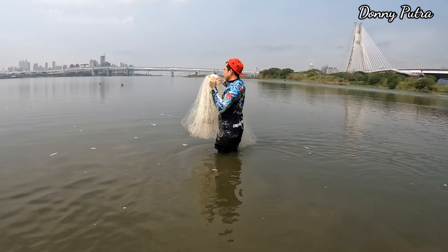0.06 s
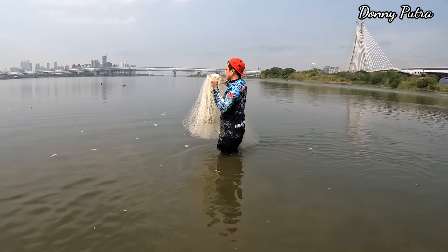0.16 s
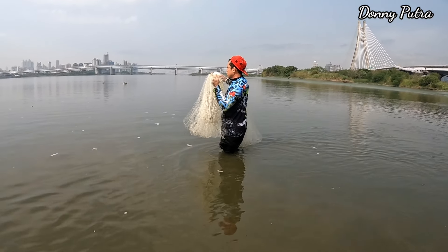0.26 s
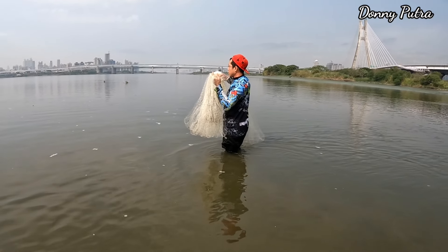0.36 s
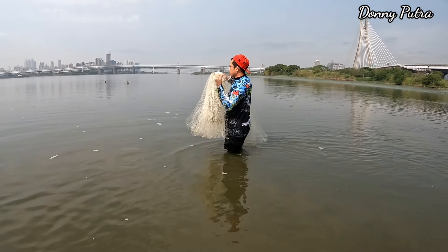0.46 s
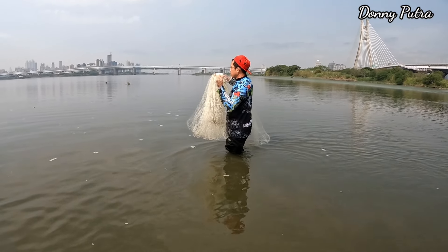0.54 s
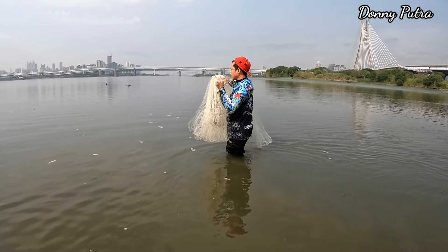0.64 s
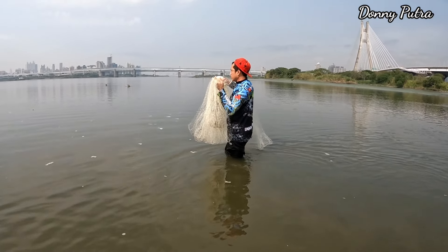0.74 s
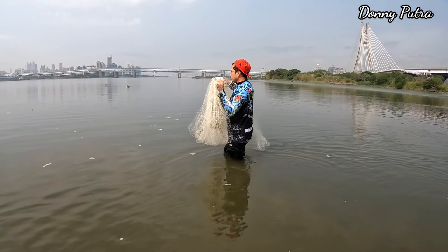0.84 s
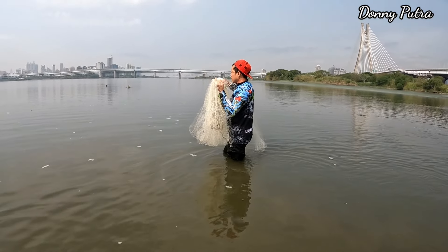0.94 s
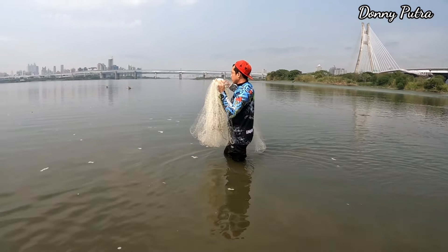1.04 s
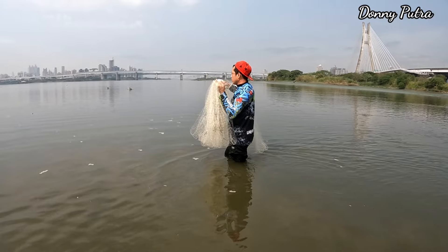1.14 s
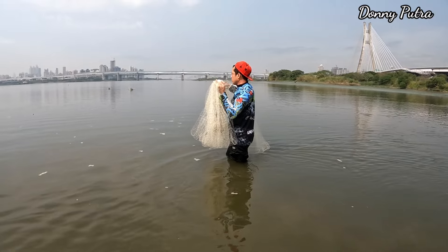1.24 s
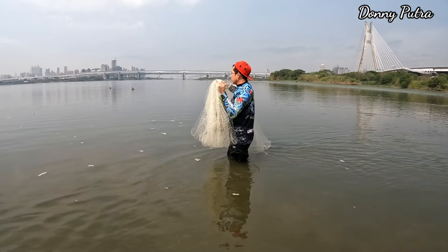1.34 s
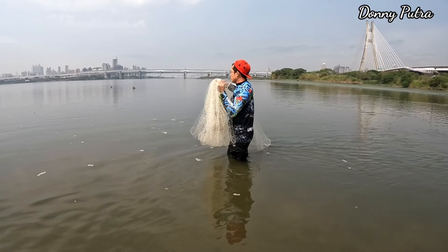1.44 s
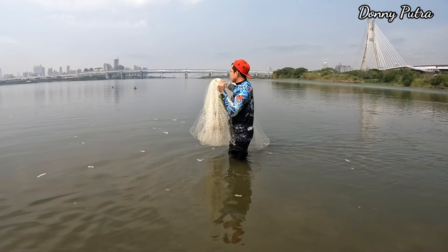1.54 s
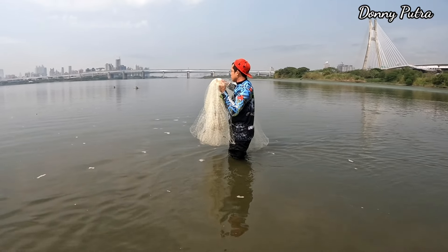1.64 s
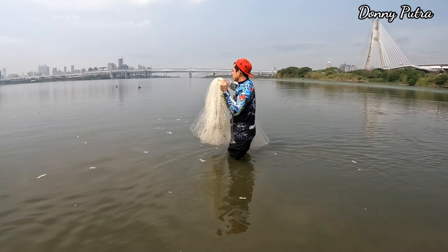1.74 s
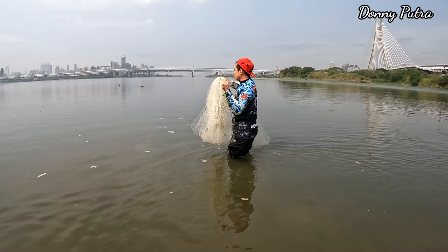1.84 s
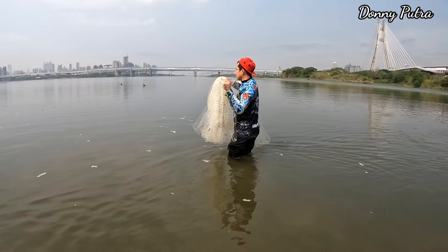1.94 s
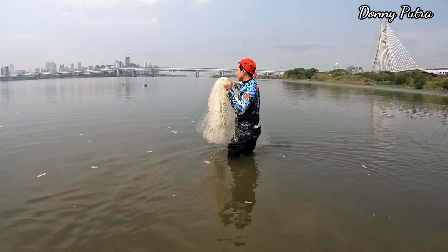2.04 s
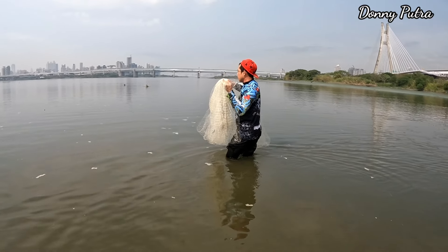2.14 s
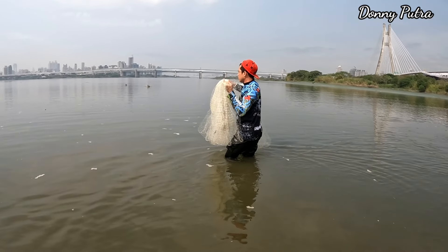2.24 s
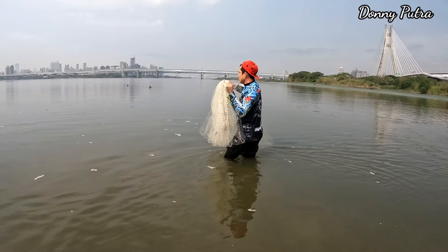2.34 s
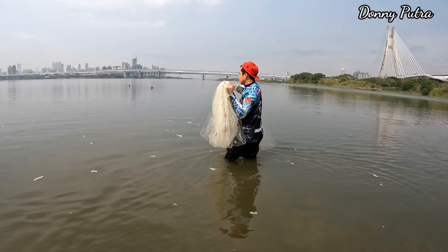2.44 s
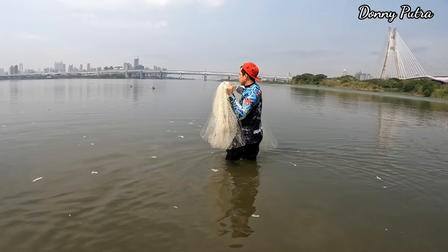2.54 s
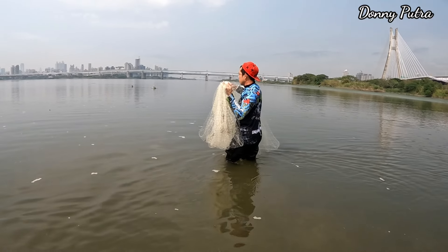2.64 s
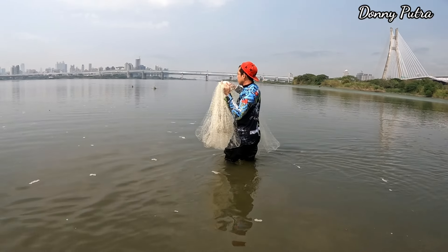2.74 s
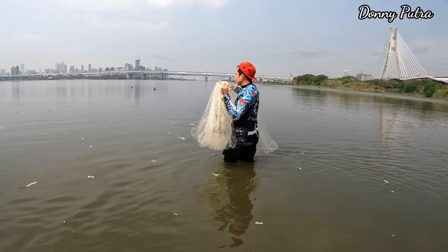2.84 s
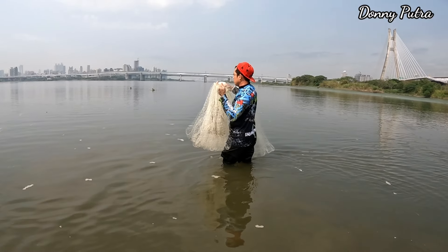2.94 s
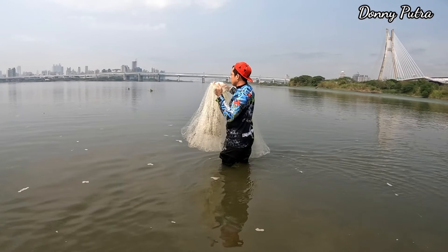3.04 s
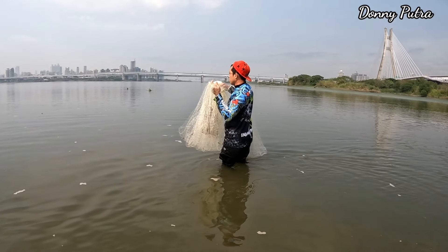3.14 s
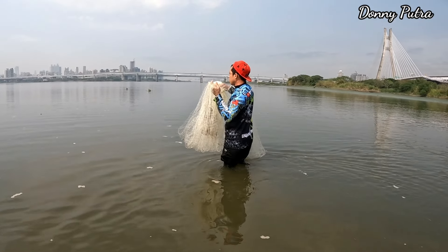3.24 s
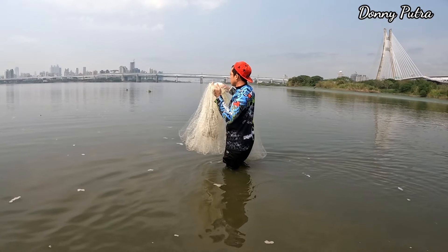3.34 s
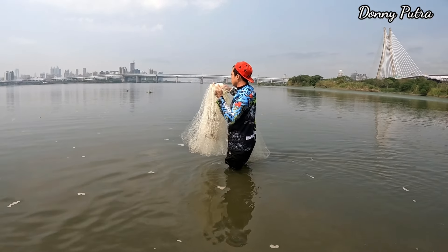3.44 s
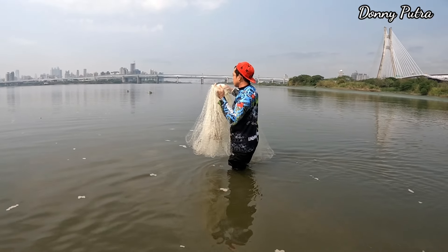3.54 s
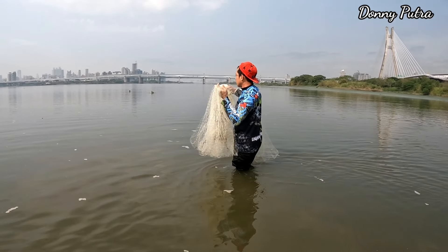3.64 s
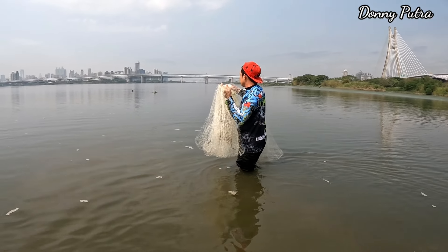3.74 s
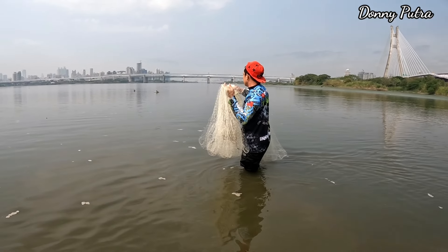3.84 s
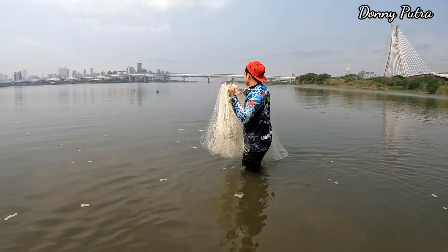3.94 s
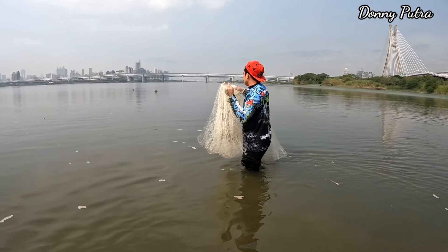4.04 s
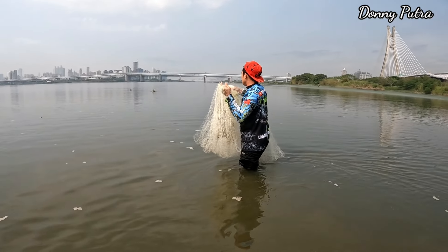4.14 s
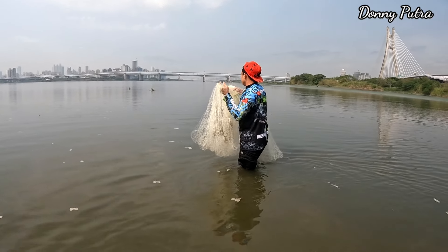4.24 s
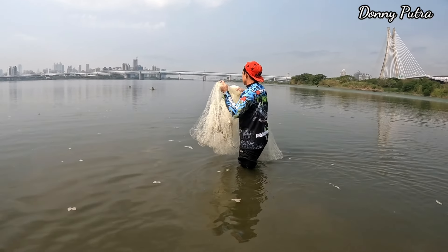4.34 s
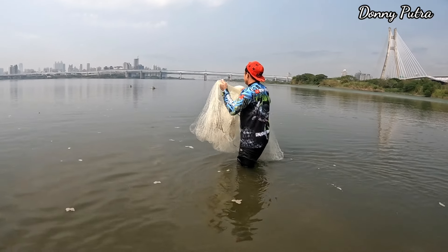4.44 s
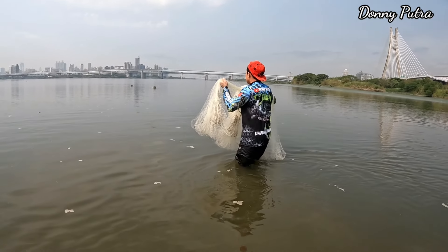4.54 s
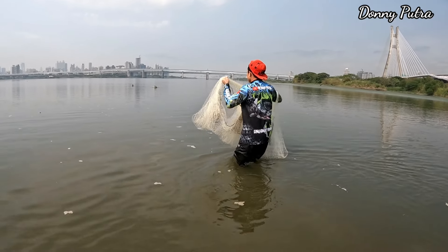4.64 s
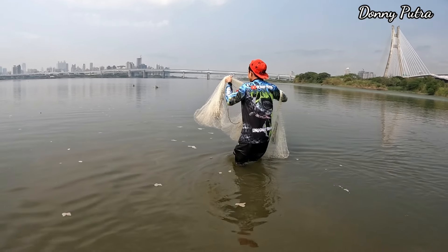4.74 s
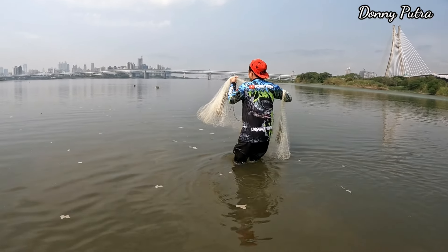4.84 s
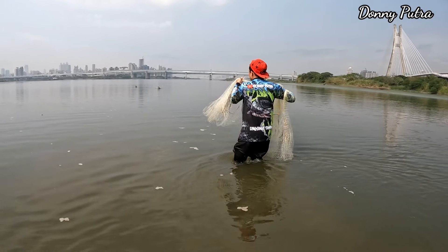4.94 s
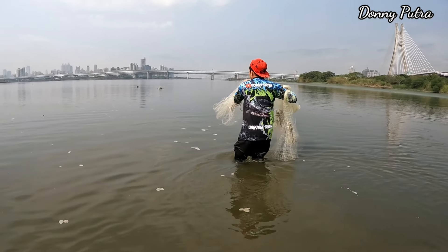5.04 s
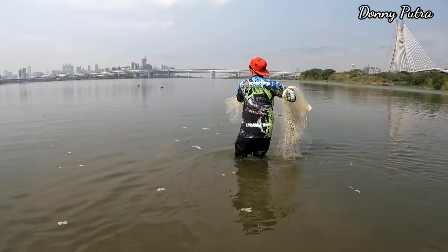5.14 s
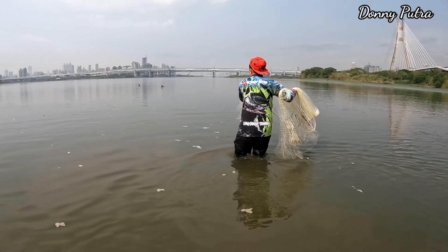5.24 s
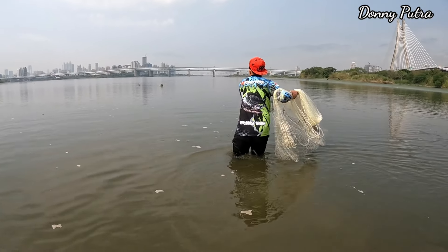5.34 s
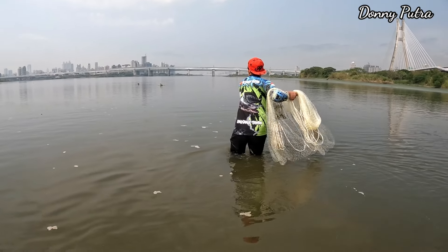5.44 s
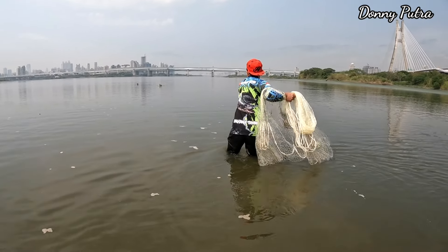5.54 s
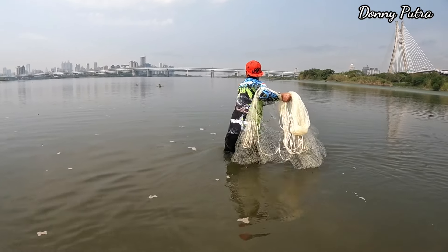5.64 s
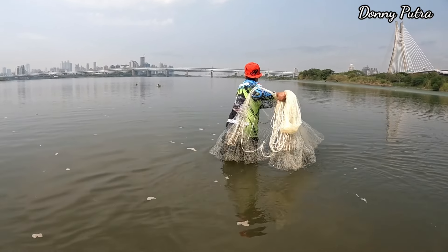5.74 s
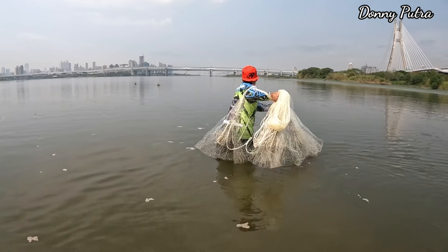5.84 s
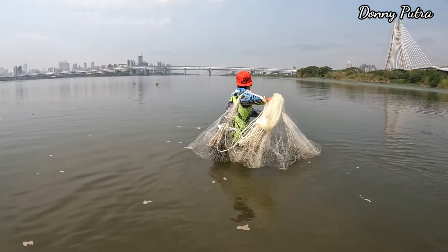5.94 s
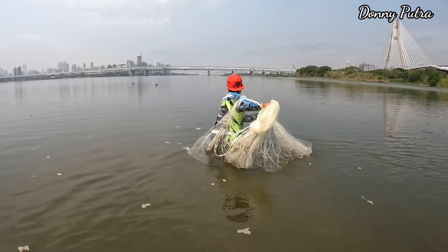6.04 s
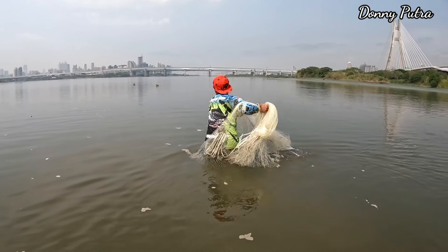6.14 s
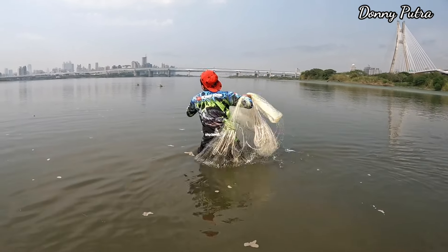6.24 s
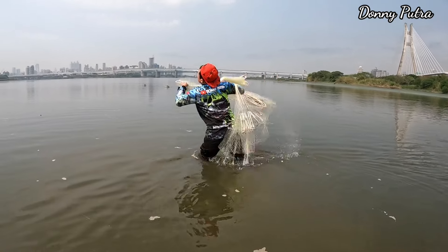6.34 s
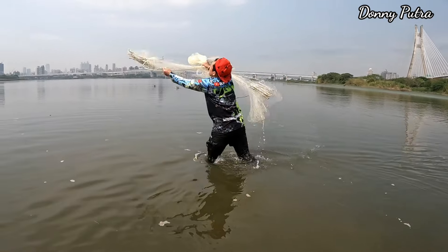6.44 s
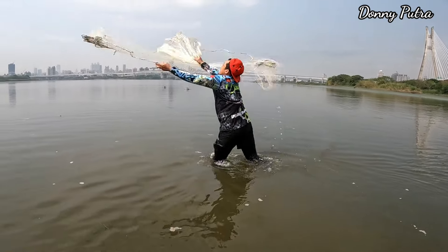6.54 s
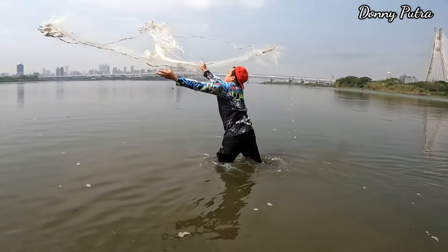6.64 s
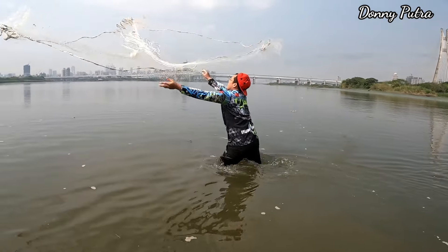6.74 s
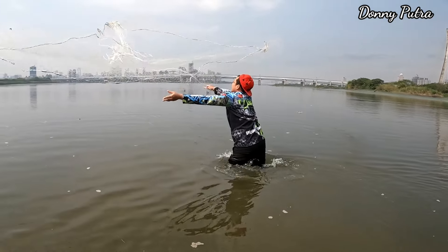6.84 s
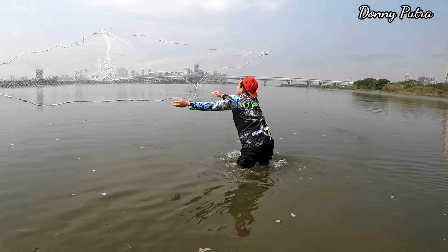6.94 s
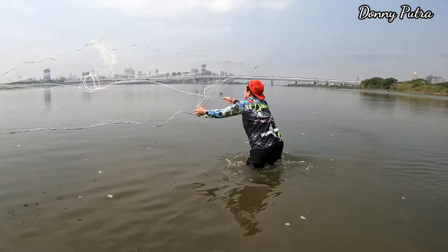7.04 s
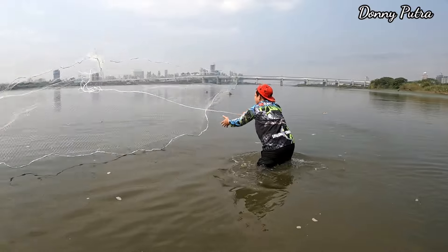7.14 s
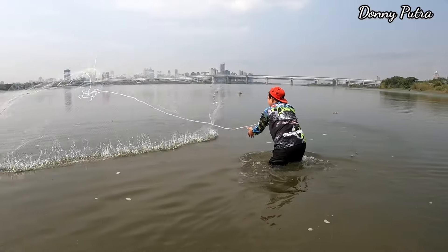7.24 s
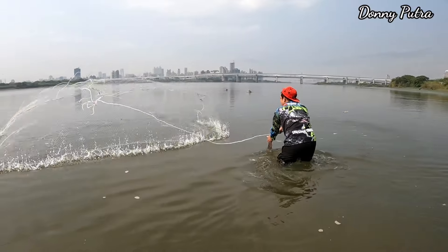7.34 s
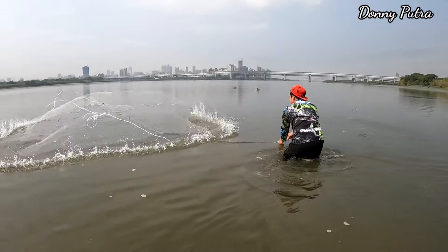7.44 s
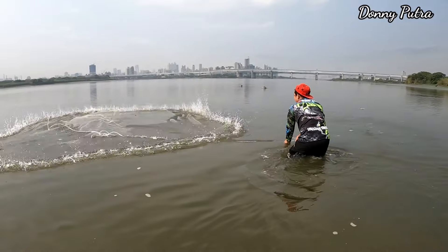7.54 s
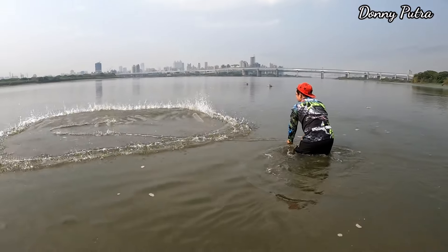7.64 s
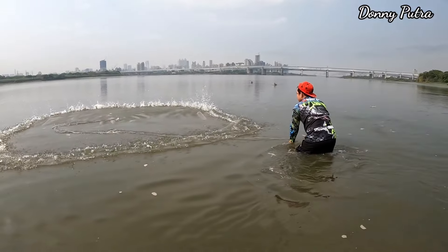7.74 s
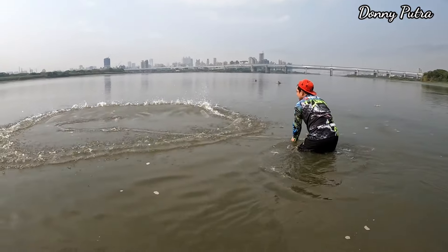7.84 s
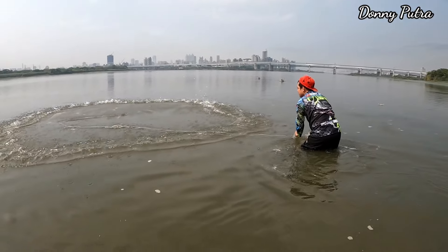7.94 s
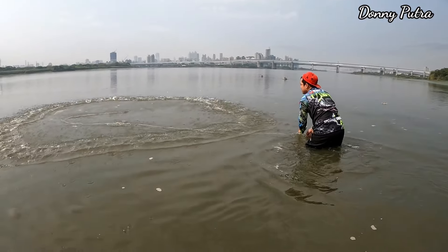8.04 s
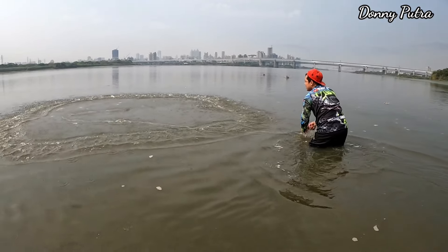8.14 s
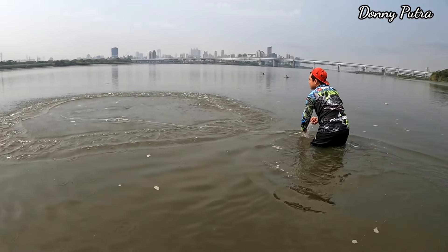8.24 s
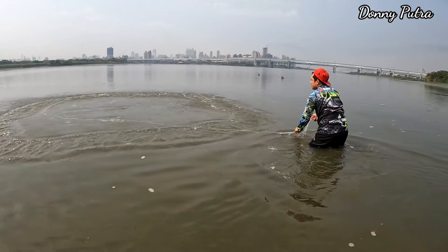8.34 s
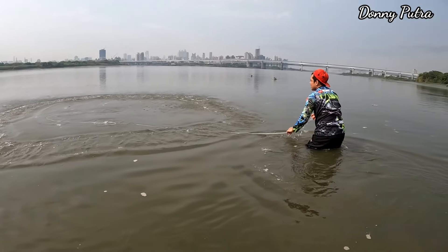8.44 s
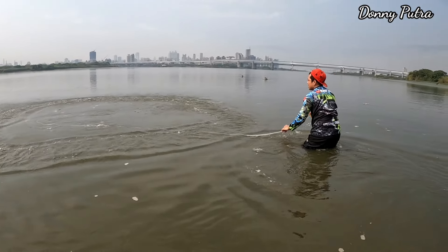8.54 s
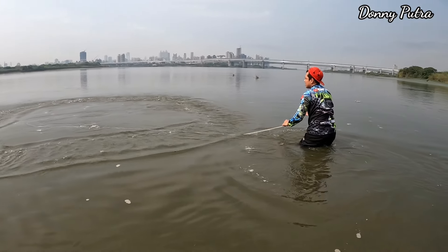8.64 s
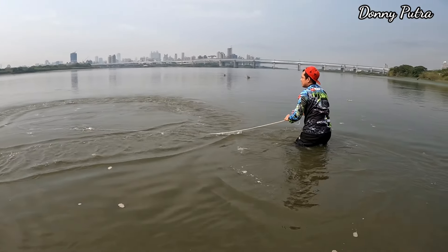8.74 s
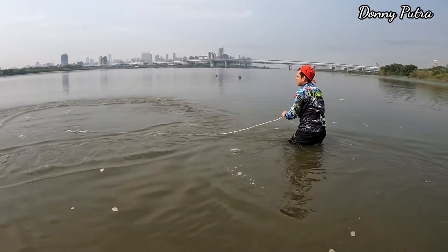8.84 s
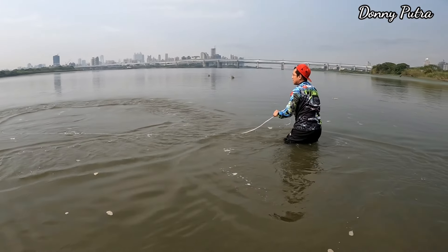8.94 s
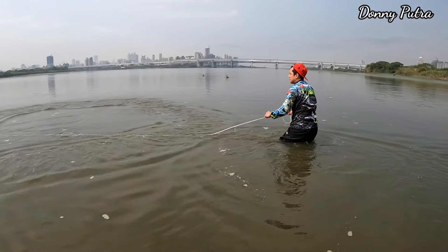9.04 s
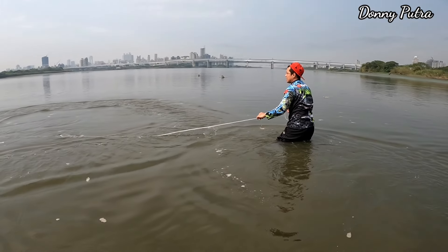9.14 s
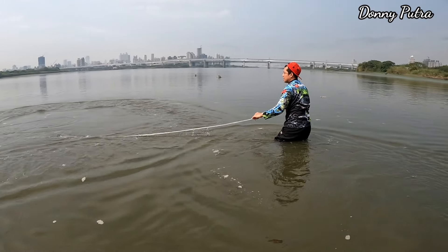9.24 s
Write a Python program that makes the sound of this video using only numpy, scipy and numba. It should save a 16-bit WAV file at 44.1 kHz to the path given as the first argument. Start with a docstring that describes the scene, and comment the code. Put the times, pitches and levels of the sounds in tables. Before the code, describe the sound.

Low distant traffic rumble and chirping birds over calm water, then legs slosh and a weighted net lands in a ring of bright splashes.

```python
"""Far traffic rumbles over water and ripples hiss faintly; one bird chips in runs, another repeats a falling song.
A wader in a calm, shallow estuary swings a wet cast net, steps, throws; the lead line lands in a ring of splashes.
Traffic and ripples are coloured noise, birds are gliding tones with scattered echoes.
Water is swarms of bubbles of three sizes, with single loud drops and droplet ticks and one climbing gulp."""
import sys
import numpy as np
from scipy import signal
from scipy.fft import rfft, irfft, next_fast_len
from scipy.io import wavfile
from scipy.ndimage import uniform_filter1d, map_coordinates
from numba import njit

SR = 44100
rng = np.random.default_rng(int(sys.argv[2]) if len(sys.argv) > 2 else 0)


def int16_out(signal):
    """Quantize to a 16-bit WAV file."""
    q = np.round(np.clip(np.atleast_2d(signal).T, -1, 1) * 32767)
    wavfile.write(sys.argv[1], SR, q.astype(np.int16))


N = 409688

# Far traffic.
# gain of rumble and hum: (time [s], level [dB])
TRAFFIC_GAIN = [(0, -37), (1.3, -36.5), (3.5, -36.5), (4.6, -38), (6.5, -37.5), (8.4, -39), (9.29, -36)]
# spectra of engine rumble, engine hum, tyre roar: (frequency [Hz], relative density [dB])
RUMBLE_SPECTRUM = [(8.8, -43), (15, -9.5), (54, 0), (86, -4), (110, -12.5), (140, -40.5), (240, -120)]
HUM_SPECTRUM = [(53, -26), (90, -2.5), (119, -2), (199, -1), (344, -12.5), (373, -15.5), (450, -17.5),
                (580, -26), (990, -120)]
ROAR_SPECTRUM = [(210, -33), (350, -15.5), (375, -11), (439, -7.5), (526, -7), (588, -5.5), (893, -8),
                 (1160, -7), (1500, -15.5), (2300, -19), (3200, -30.5), (4300, -44.5), (5200, -54),
                 (6760, -87.5), (11400, -120)]
# stereo width of far sound: (frequency [Hz], side over mid [dB])
FAR_SIDE = [(60, -24), (110, -32.5), (200, -24), (380, -15), (700, -12.5), (1290, -9), (2380, -5.5),
            (4400, 2), (8120, -10.5), (15000, 1.5)]
# engine notes, one list each: (time [s], frequency [Hz], level [dB])
ENGINE_NOTES = [
    [(0, 385, -47.5), (.36, 377.5, -54)],
    [(.95, 355.7, -53.5), (1.3, 370.6, -51.5), (1.75, 372, -50.5)],
]
RUMBLE_OVER_HUM_DB, ROAR_DB = 0, -48

# Ripples.
# surface hiss: (time [s], level [dB])
RIPPLE_GAIN = [(0, -80), (0.3, -80), (0.85, -82), (1.7, -86.5), (1.85, -76), (2.4, -77), (2.65, -84),
               (3, -86), (3.35, -78.5), (3.6, -88), (3.95, -83), (4.8, -78)]

# Droplets striking the surface.
# loudest ones: (time [s], level before part offsets [dB], ring frequency [Hz], low part offset [dB])
TICKS = [(0.0558, -47, 7560, -13), (1.5683, -63, 5150, 0), (1.9096, -59, 6760, 3), (1.9626, -54.5, 5700, 7),
         (2.0173, -60, 7000, -7), (2.0224, -53, 7250, 3), (2.7337, -61, 7640, -5), (2.8074, -60, 7210, 7),
         (2.836, -59, 6870, 0), (4.4139, -63, 5110, 2), (4.7656, -59, 5690, 1), (4.8843, -54, 6880, -2),
         (4.9367, -53, 7130, 5), (4.9496, -43, 7000, -8), (4.9624, -52, 7190, 0), (5.014, -56, 7310, 9),
         (5.0474, -47, 8800, 5), (5.0715, -45.5, 6000, -2), (5.106, -46, 7160, -9), (5.1577, -53, 8990, -5),
         (5.166, -49, 6550, -2), (5.226, -51, 7880, 5), (5.3263, -57, 9660, 0), (5.5398, -51, 6800, -11),
         (5.6104, -51, 7890, -6), (5.6361, -59, 5760, 11), (5.7892, -54, 6330, 10), (5.9095, -47, 6830, -5),
         (5.9494, -55, 7700, -2), (5.9768, -52, 7140, 1), (6.001, -35.5, 9660, -17), (6.131, -44, 7510, -4),
         (6.1858, -28, 7060, -13), (6.2305, -36.5, 6890, -3), (6.2597, -32, 7820, -2),
         (6.3644, -50, 6980, -2), (6.3904, -36, 7030, 1), (6.5368, -34, 7770, -6), (6.6104, -34, 7500, -9),
         (6.6656, -33, 5030, -3), (6.7143, -39, 6690, 2), (6.759, -33, 6350, -2), (6.822, -40.5, 6770, 5),
         (6.908, -35, 7650, 10), (6.9494, -32, 5810, 2), (6.9635, -28, 6790, 3), (7.013, -23.5, 6200, -4),
         (7.025, -30.5, 6120, 0), (7.1324, -31, 7630, -3), (7.1714, -49, 7070, 9), (7.281, -41, 6070, 5),
         (7.317, -39, 5150, -4), (7.3238, -30, 6950, -13), (7.334, -28.5, 7230, -7),
         (7.343, -21.5, 7200, -10), (7.355, -21, 6300, -9), (7.359, -24.5, 7200, -2),
         (7.384, -31.5, 5920, 5), (7.417, -22.5, 5110, 0), (7.4254, -18.5, 7000, -14),
         (7.4764, -24, 6480, 2), (7.5183, -28.5, 6560, -5), (7.5287, -26.5, 7160, -8),
         (7.6393, -21.5, 5080, -3), (7.6805, -22, 6500, -10), (7.7346, -28.5, 6380, -4),
         (8.0254, -37.5, 5960, 4), (8.0686, -35.5, 5200, 9), (8.2197, -37, 7820, -1),
         (8.2424, -31, 5990, 0), (8.3232, -33.5, 7300, -10), (8.3579, -43, 7540, -9),
         (8.4083, -40, 7770, -10), (8.538, -37, 7240, -5), (8.588, -35, 7460, -5.5),
         (8.6572, -44.5, 6240, -12), (8.7037, -37, 6720, -10), (8.8284, -40, 7530, -23),
         (9.0189, -54, 8420, -10), (9.0359, -57, 6340, -9)]
# parts of a tick: ring (length [cycles], offset [dB]), then high and low
# (frequency [Hz], length [cycles], offset [dB])
TICK_PARTS = [(1.8, -2.2), (8100, 0.53, -4), (3430, .8, 0.95)]
# (time [s], left minus right [dB])
TICK_PAN = [(7.3, 1), (7.33, 2.5), (8.55, 3), (8.7, -0.5)]

# Birds.
# chips: (time [s], level before note offsets [dB])
CHIPS = [(0.1735, -71), (0.3561, -74), (0.5417, -73), (0.7138, -74), (0.8994, -72), (1.0814, -71),
         (1.257, -72), (1.4401, -71), (1.6167, -70), (1.8093, -71), (1.9794, -72), (2.167, -70),
         (2.3516, -75), (2.5396, -73), (2.7671, -75), (4.0736, -77), (4.2896, -76), (4.4997, -75),
         (4.6952, -76), (4.8928, -74), (5.2744, -76), (5.4605, -72), (5.6575, -73), (5.8446, -68),
         (6.0432, -71)]
# notes of a chip: (time in chip [s], length [s], start, end pitch [ratio to chip pitch], bend [exponent],
# offset [dB])
CHIP_NOTES = [(-.002, 0.019, .995, 1.005, 0.88, 1.9), (0.026, .016, .86, .78, 1.5, -2)]
# chip pitch: (time [s], frequency [Hz])
CHIP_PITCH = [(0, 5820), (1.1, 5760), (1.3, 5800), (2.2, 5820), (2.8, 5600), (4.7, 5660), (4.9, 5800),
              (5.3, 5660), (6.1, 5740)]
# falling song: (time in phrase [s], length [s], start [Hz], end [Hz], bend [exponent],
# level before phrase offset [dB])
SONG_NOTES = [(-.06, .025, 5100, 4800, 1, -78), (0, .035, 4960, 4880, .8, -73),
              (0.019, .05, 4700, 4000, .8, -73.5), (.122, 0.074, 4500, 4360, .5, -72.5),
              (0.192, 0.018, 4080, 3700, 1, -68.5), (0.271, .075, 4130, 3970, 2, -76),
              (.338, .035, 3990, 3540, 2, -67), (0.437, .052, 3910, 3990, 1, -71.5),
              (.488, .038, 3600, 3220, 1.7, -66.5), (0.545, 0.034, 3430, 2900, 1.6, -64),
              (0.583, 0.046, 3790, 3450, 1.2, -69.5)]
# (time [s], offset [dB])
PHRASES = [(.805, 4), (2.355, 2.5), (4.295, 1.5)]
# other short whistles, mostly low, a few high:
# (time [s], length [s], start [Hz], end [Hz], bend [exponent], level [dB])
WHISTLES = [(0.597, 0.036, 3300, 3050, 1.5, -66), (0.82, 0.049, 2850, 2700, 1, -58),
            (.865, .048, 2800, 3510, .8, -61), (0.886, .025, 2800, 2600, 1, -60),
            (1.23, .035, 3250, 3080, 1, -68), (2.35, .033, 3400, 3100, .7, -58),
            (2.396, .055, 3230, 3050, 1, -57.5), (2.51, .06, 3080, 3270, 1, -64.5),
            (2.76, .03, 2990, 2700, 1, -66), (2.94, 0.044, 2450, 2600, 1, -55.5),
            (3.135, .03, 3170, 3240, 1, -62), (3.172, 0.048, 3120, 2990, 0.72, -60.5),
            (3.488, 0.024, 2510, 2600, 1, -56.5), (4.37, 0.026, 3400, 3200, 1.5, -70),
            (4.51, 0.027, 2420, 2750, 1, -60), (4.54, 0.023, 2650, 2530, 1, -59.5),
            (4.47, 0.18, 4240, 4560, .4, -76), (4.671, .055, 3050, 3260, .5, -59),
            (4.696, .032, 3150, 2800, 1.5, -62), (5.194, .013, 5560, 6560, 1.1, -61),
            (5.282, .018, 3700, 3450, 1, -65), (5.288, 0.046, 3050, 3140, 1.1, -59),
            (5.473, 0.039, 2700, 2250, 1.5, -53), (5.99, 0.045, 2850, 2400, 2, -50),
            (6.128, 0.021, 3040, 2710, 1.2, -59)]

# Near water.
# loudest single bubbles: (peak time [s], peak level [dB], frequency [Hz], length [cycles])
DROPS = [(1.9652, -42, 2020, 2.4), (2.1304, -53, 4100, 2.2), (2.8169, -49, 2880, 2.5), (.671, -56, 3800, 2),
         (0.977, -50, 2900, 1.2), (2.782, -62, 4150, 2.5), (3.384, -51, 2700, 2.5), (3.499, -61, 3850, 2.8),
         (3.542, -55, 2720, 4), (4.756, -54, 2400, 4), (4.8255, -40.5, 1390, 3.5), (4.8714, -46, 2540, 2),
         (4.9034, -48, 3200, 3.6), (4.9385, -27, 1900, 1), (4.942, -28.5, 1410, 3.5),
         (4.934, -34.5, 2430, 2.2), (5.083, -47, 3300, 1), (4.953, -53, 3080, 3.6),
         (4.9587, -48, 5050, 3.6), (5.0985, -39, 3100, .9), (5.0186, -41.5, 1310, 6.3),
         (5.043, -41, 2510, 3), (5.051, -35.5, 2900, 3), (5.078, -41, 1210, 6.6), (5.0895, -34, 3220, 1),
         (5.0893, -37, 1220, 2), (5.1146, -42, 2380, 1.7), (5.1383, -44, 3200, 1.4),
         (5.1995, -42, 1410, 3.8), (5.2276, -39, 3300, 1.6), (5.23, -45, 1800, 4), (5.32, -50, 1900, 4),
         (5.745, -47, 2200, 2), (5.95, -51, 4150, 2), (6.005, -52, 3000, 2), (6.035, -48, 2900, 2),
         (5.4087, -42, 1450, 2.4), (5.496, -49, 2360, 3.6), (5.5025, -41, 2240, 1.5),
         (5.6392, -43, 2100, 1.7), (5.67, -44, 2400, 2), (5.71, -49, 2600, 2), (5.762, -49, 2900, 2.7),
         (5.806, -48, 3030, 3), (5.332, -53, 2390, 2), (5.791, -47, 2550, 4.4), (5.9929, -47, 4000, 3.2),
         (6.186, -24, 2540, 0.5), (6.2815, -31, 3590, 1.2), (6.2964, -26, 3900, 0.75),
         (6.2977, -35, 2120, 4.4), (6.3277, -25, 3040, 1.5), (6.3386, -21.5, 3870, 1.1),
         (6.381, -35, 2400, 2.7), (6.469, -35, 2740, 1.8), (6.4878, -29, 2700, 1), (6.6, -30, 3200, 1.8),
         (6.666, -29, 3230, 1.5), (6.5463, -29.5, 1280, 4.8), (6.5621, -25.5, 1120, 1.4),
         (6.678, -28, 3250, 1.6), (6.6793, -26, 1170, 1.5), (6.6936, -22, 1120, 1.4),
         (6.703, -32, 1150, 2.2), (6.72, -34, 1230, 3.2), (6.7512, -23, 3100, 1.4), (6.707, -33, 1880, 1.5),
         (6.76, -22, 2860, 1), (6.823, -30, 2920, 1.5), (6.8478, -21, 2390, 0.7), (6.8494, -29, 2900, 5),
         (6.9085, -18, 3080, 1.5), (6.9195, -30, 2310, 3.3), (6.9252, -16.5, 724, 1.3),
         (6.927, -24.5, 2000, 1.3), (6.9377, -22, 3240, 0.67), (6.9617, -20, 1890, 1.1),
         (6.966, -11, 720, 0.82), (6.998, -19.5, 1340, 1.7), (7.0132, -22, 300, 0.37),
         (7.058, -27, 1340, 2), (7.159, -34, 900, 1.5), (7.0132, -31, 3030, 12), (7.133, -22, 2870, 1.2),
         (7.1422, -25, 2260, 1.1), (7.213, -28, 1250, 1.4), (7.275, -25, 1220, 2.1),
         (7.173, -33, 3770, 2.8), (7.223, -33, 3370, 1.5), (7.3432, -13.5, 2800, 0.43),
         (7.397, -30, 3180, 1.5), (7.4137, -21, 1210, 3.6), (7.4221, -27, 3610, 1.1), (7.431, -21, 4740, 2),
         (7.4183, -19.5, 688, 0.45), (7.426, -23, 800, 0.57), (7.433, -13.5, 1460, 1.2),
         (7.443, -30, 760, 1), (7.4545, -21, 1580, 1.4), (7.4622, -17, 2470, 1.5), (7.4705, -24, 2290, 2.7),
         (7.484, -15, 1840, 1), (7.4865, -13, 750, 0.27), (7.4905, -22, 825, 1), (7.498, -24, 1550, 0.85),
         (7.523, -20.5, 940, 3.1), (7.53, -24, 980, 1.3), (7.5535, -17, 746, 1.2), (7.561, -34, 920, 1.6),
         (7.5695, -15, 796, 0.71), (7.5742, -23, 4700, 2.4), (7.5753, -21.5, 790, 1.7),
         (7.5912, -23, 3810, 0.62), (7.683, -23, 3420, 1.9), (7.7389, -18.5, 558, 2.5),
         (7.7509, -17, 970, 1.7), (7.7517, -25, 1910, 1.6), (7.7713, -22, 594, 1.7), (7.657, -28, 780, 1.2),
         (7.694, -27, 1070, 1.1), (7.722, -18, 1020, 1.5), (7.85, -34, 720, 2.1), (7.82, -36, 1230, 4.3),
         (7.87, -30, 1250, 2.5), (7.879, -30, 2100, 2.8), (7.91, -36, 1210, 4.1), (7.95, -27, 1400, 1),
         (7.992, -21, 2900, 1.4), (7.9925, -30, 1000, 0.61), (8.0375, -29, 1140, 3.2),
         (8.12, -35.5, 1120, 4.4), (8.125, -31, 1790, 2.6), (8.42, -40, 1150, 3), (8.3091, -35, 2950, 3.3),
         (8.312, -34, 780, 3), (8.47, -34.5, 1600, 3.3), (8.504, -39.5, 2700, 3.2), (8.514, -43, 3700, 2),
         (8.538, -46, 3600, 2), (8.554, -45, 3500, 2), (8.557, -44, 2200, 3), (8.578, -46, 3400, 1.5),
         (8.596, -44, 3100, 3), (8.627, -50, 3000, 1.5), (8.645, -47, 2950, 3), (8.808, -47, 3450, 2),
         (8.92, -58, 2900, 2.5), (8.733, -39.5, 1820, 2.9), (9.0005, -48, 2660, 3.7)]
# stirring by legs, mesh and lead line: (time [s], small bubbles [dB], large over small [dB])
STIR = [(4.7, -71, 0), (4.9, -68.5, -1), (5.12, -69.5, 18), (5.45, -74.5, 3), (5.62, -70, 8),
        (5.78, -62, 0), (6.17, -62.5, 10.5), (6.3, -46, -9), (6.6, -42.5, -1.5), (6.88, -43, 2),
        (7.05, -38, 3), (7.28, -47.5, 3.5), (7.45, -36.5, 3.5), (7.62, -35, 2.5), (7.85, -36, 0),
        (8.05, -36, -2.5), (8.45, -53.5, -0.5), (8.75, -69, -16), (9.28, -74, 9)]
# slaps of legs, mesh and leads: (peak time [s], small bubbles [dB], large over small [dB],
# spray over small [dB])
SLAPS = [(4.939, -50.5, 9, -7), (5.05, -52, -9, -15), (5.075, -59, 0, -12), (5.097, -52, 2, -16.5),
         (5.225, -63, 8, -12), (6.0, -56, -1, -2), (6.319, -36.5, -23, -9), (6.549, -41.5, 5.5, -25),
         (6.39, -54, -8, -3), (6.678, -36.5, -2, -12), (6.705, -42, 5, -26), (6.85, -45, -10, -24),
         (6.911, -31.5, -11, -16), (6.968, -36, -4, -20), (7.07, -48, 10, -20), (7.331, -38.5, -22, 3.5),
         (7.358, -35.5, -17, -0.5), (7.412, -30, 8, -5), (7.428, -27.5, 6, -17), (7.55, -47, 17.5, -5),
         (7.6, -42.5, -7, 2.5), (7.675, -30, -3, -5), (7.726, -28.5, 3.5, -21), (7.747, -26, 3.5, -11),
         (7.77, -41, -2, 0.5), (7.999, -37.5, 3, -17.5)]
# droplets shed by the hauled line: (time [s], extra spray [dB])
DRIPPING = [(8.2, 0.5), (8.7, 8)]
# landing ring: (time [s], share of the spray [0..1])
RING_SHARE = [(7.25, 0), (7.45, 1), (8.25, 1), (8.55, 0)]
# spectra of large bubbles, small bubbles, landing ring spray, drips off the near mesh:
# (frequency [Hz], relative density [dB])
SLOSH_SPECTRUM = [(160, -47), (280, 0.5), (351, -6), (461, -10.5), (591, -6.5), (642, -5.5), (1090, -5.5),
                  (1700, -10), (2210, -45), (3740, -120)]
SPLASH_SPECTRUM = [(820, -17), (1400, -8.5), (1690, -10), (1890, -7), (2740, -6.5), (3630, -9), (4000, -14),
                   (5000, -19.5), (6500, -11.5), (11000, -120)]
SPRAY_SPECTRUM = [(2590, -38), (4400, -9.5), (7230, -7.5), (8300, -14), (9820, -16), (10600, -27),
                  (11800, -18.5), (14500, -36), (15600, -52)]
DRIP_SPECTRUM = [(2590, -30), (4400, -4.5), (5130, -10.5), (7350, -0.5), (8250, -6.5), (9570, -8.5),
                 (12400, -16.5), (14500, -28), (15600, -46)]
# stereo width of near water: (frequency [Hz], side over mid [dB])
NEAR_SIDE = [(200, -16), (700, -13.5), (1300, -11), (2400, -12.5), (4400, -6), (8000, -13), (15000, 0.5)]
# wader ahead, net landing left: (time [s], left minus right [dB])
NEAR_PAN = [(7.25, .2), (7.35, 2), (8.4, 1.4), (9.29, .8)]
# air cavity closing behind a leg: (time [s], frequency [Hz], level [dB])
GULP = [(6.501, 430.5, -25), (6.515, 450, -37.5), (6.535, 477, -35), (6.553, 563, -41), (6.578, 870, -36)]
SPRAY_DB, SPRAY_AT_DB = -47, -35.5  # spray level at this small-bubble level
SPRAY_DB_PER_STIR_DB = 0.81
RISE_DB_PER_S, FALL_DB_PER_S = 1400, 291  # slap flanks
RING_PAN_DB = 1  # left minus right
STRAY_DROP_DB, STRAY_TICK_DB = 0.5, -1  # offsets over small bubbles, over spray
STRAY_SCATTER_DB = 3

# Pickup.
# lag of the left port: (time [s], delay [microseconds])
LAG = [(0, 31), (7.25, 28), (7.35, 14), (8.3, 14), (8.8, 30)]
TOP_HZ = 15700


def amp(db):
    """Decibels to gain."""
    return 10 ** (np.asarray(db) / 20)


def unit(x):
    """Scaled to rms 1."""
    return x / np.sqrt(np.mean(x ** 2) + 1e-20)


def along(points, hz):
    """(Hz, value) points interpolated on a log frequency axis."""
    f, v = np.transpose(points)
    return np.interp(np.log(hz + 1), np.log(f + 1), v)


def curves(rows):
    """One value per sample for each column after the time."""
    s, *cols = np.transpose(rows)
    return [np.interp(np.arange(N) / SR, s, c) for c in cols]


def filtered(x, response):
    """x times a response of frequency."""
    m = next_fast_len(N + 8192)
    return irfft(rfft(x, m) * response(np.fft.rfftfreq(m, 1 / SR)), m)[..., :N]


def spread(pair, spectrum, side):
    """Two unrelated signals coloured as mid and side, rms 1."""
    def response(hz):
        return amp(along(spectrum, hz) + [0 * hz, along(side, hz)])
    mid, edge = filtered(pair, response)
    return unit(np.array([mid + edge, mid - edge]))


def panned(x, left_minus_right_db):
    """Level difference split evenly between the sides."""
    return x * amp(np.array([left_minus_right_db, -left_minus_right_db]) / 2)


def smoothed_noise(shape, sizes):
    """Noise smoothed along (frequency bins, time frames)."""
    field = uniform_filter1d(rng.standard_normal(shape), size=sizes[0], axis=0)
    return uniform_filter1d(field, size=sizes[1], axis=1)


def patchy(depth_db):
    """Two noises with shared time-frequency patches of random gain."""
    z = signal.stft(rng.standard_normal((2, N)), nperseg=512)[2]
    field = smoothed_noise(z.shape[1:], (5, 12))
    return signal.istft(z * amp(depth_db * unit(field)), nperseg=512)[1][:, :N]


def spurts(size):
    """Random swells about size samples long, rms 1."""
    smooth = uniform_filter1d(rng.standard_normal(N), size=size)
    return unit(uniform_filter1d(smooth, size=size))


def glide(rows):
    """A tone along (s, Hz, dB) rows, unsteady in pitch and level."""
    hz, db = curves(rows)
    hz = hz * (1 + .012 * spurts(size=1500))
    db = db + 2.2 * spurts(size=2000)
    t = np.arange(N) / SR
    fade_in = (t - rows[0][0]) / 0.0013
    fade_out = (rows[-1][0] - t) / 0.0068
    gate = np.clip(np.minimum(fade_in, fade_out), 0, 1)
    return np.sqrt(2) * gate * amp(db) * np.sin(2 * np.pi * np.cumsum(hz) / SR)


@njit
def add(out, s, hz, cycles, gain, rise, soft, sr):
    """Rings peaking at s: they swell (soft: how gently) and die away; rise lifts the pitch as a bubble surfaces."""
    lead = np.sqrt(soft)
    for k in range(len(s)):
        tau = cycles[k] / hz[k] * sr
        start = max(int(s[k] * sr - lead * tau), 0)
        for i in range(min(int(7 * tau) + 2, len(out) - start)):
            u = i / tau / lead
            w = i / tau - lead  # zero at the peak
            swell = (u * np.exp(1 - u)) ** soft
            out[start + i] += gain[k] * swell * np.cos(2 * np.pi * cycles[k] * (w + rise * w * w / 2))


def stirring():
    """Levels in dB of large bubbles, small bubbles and spray in the churned water."""
    small_db, large_over_db = curves(STIR)
    extra_db, = curves(DRIPPING)
    spray_db = SPRAY_DB + SPRAY_DB_PER_STIR_DB * (small_db - SPRAY_AT_DB) + extra_db
    return np.array([small_db + large_over_db, small_db, spray_db])


def stirred_share():
    """Crossfade from ripples to churned water, 0 to 1."""
    return np.clip((np.arange(N) / SR - STIR[0][0]) / .15, 0, 1)


def strays(level_db):
    """Weaker random strikes following a level curve: times, levels, two random numbers each."""
    when, pitch, life, size = rng.random((400, 4)).T
    when = STIR[0][0] + when * (STIR[-1][0] - STIR[0][0])
    scatter_db = -STRAY_SCATTER_DB * np.log(size + 0.023)
    return when, level_db[(when * SR).astype(int)] + scatter_db, pitch, life


def traffic():
    """Engines rumble and hum as swelling low noise, tyres roar steadily; engine notes glide."""
    rumble = amp(RUMBLE_OVER_HUM_DB) * spread(patchy(0.84), RUMBLE_SPECTRUM, FAR_SIDE)
    hum = spread(patchy(0.8), HUM_SPECTRUM, FAR_SIDE)
    engine_gain = amp(curves(TRAFFIC_GAIN)[0] + 0.55 * spurts(size=9000))
    roar = amp(ROAR_DB) * spread(patchy(1.22), ROAR_SPECTRUM, FAR_SIDE)
    return engine_gain * (rumble + hum) + roar + sum(map(glide, ENGINE_NOTES))


def ripples():
    """Ripples fizz as patchy high noise until the water is stirred."""
    hiss = spread(patchy(1.5), DRIP_SPECTRUM, FAR_SIDE)
    return (1 - stirred_share()) * amp(curves(RIPPLE_GAIN)[0]) * hiss


def ticks():
    """Each droplet strike is a short burst: a ring at its own pitch with a fixed high and low part."""
    when, db, pitch, life = strays(stirring()[2] + STRAY_TICK_DB)
    stray = np.transpose([when, db, 5000 * 2 ** pitch, -8 * life])
    s, db, hz, low_db = np.vstack([TICKS, stray]).T
    (ring_cycles, ring_db), high, (low_hz, low_cycles, low_part_db) = TICK_PARTS
    parts = [(hz, ring_cycles, ring_db), high, (low_hz, low_cycles, low_part_db + low_db)]
    out = np.zeros(N)
    for part_hz, part_cycles, part_db in parts:
        add(out, s + 0.00034, part_hz + 0 * s, part_cycles + 0 * s, amp(db + part_db), 0., 1., SR)
    return panned(out, curves(TICK_PAN)[0])


def notes(rows):
    """Whistled notes gliding between two pitches; a large bend holds the first pitch longer."""
    out = np.zeros(N + SR)
    # moving air ruffles far notes
    waver = uniform_filter1d(rng.standard_normal((2, N + SR)), size=300)
    for s, length, start_hz, end_hz, bend, db in rows:
        start = round(s * SR)
        u = np.arange(int(length * SR)) / (length * SR)
        pitch, level = unit(waver[:, start:][:, :len(u)])
        hz = start_hz + (end_hz - start_hz) * u ** bend + 30 * pitch
        swell = np.sin(np.pi * u) ** .7
        out[start:][:len(u)] += amp(db + 2.2 * level) * swell * np.sin(2 * np.pi * np.cumsum(hz) / SR)
    return out[:N]


def echoes(dry):
    """Decaying noise tails, redrawn block by block, so the echo keeps changing."""
    t = np.arange(SR // 3) / SR
    echo = np.zeros((2, N + len(t)))
    for start in range(0, N, 4096):
        tail = rng.standard_normal((2, len(t))) * amp(-60 * t / 0.28)  # 60 dB in 0.28 s
        tail = tail / np.linalg.norm(tail[0])
        part = signal.fftconvolve(dry[:, start:start + 4096], tail, axes=1)
        echo[:, start:start + part.shape[1]] += part
    return echo[:, :N]


def birds():
    """A chip is a short rising note then a weaker falling one; song and whistles glide; echoes trail all."""
    pitch_hz = np.interp([s for s, _ in CHIPS], *np.transpose(CHIP_PITCH))
    chips = [(start + s, length, a * hz, b * hz, bend, level + db)
             for (start, level), hz in zip(CHIPS, pitch_hz)
             for s, length, a, b, bend, db in CHIP_NOTES]
    song = [(start + s, length, a, b, bend, db + level)
            for start, level in PHRASES
            for s, length, a, b, bend, db in SONG_NOTES]
    dry = panned(notes(chips), np.array([-2.2])) + notes(song + WHISTLES)
    return dry + amp(-3.0) * echoes(dry)


def placed(x):
    """Near water set between the two ports."""
    return panned(x, curves(NEAR_PAN)[0])


def drops():
    """Single bubbles, each ringing at its own slightly rising pitch; weaker ones fall at random."""
    when, db, pitch, life = strays(stirring()[1] + STRAY_DROP_DB)
    stray = np.transpose([when, db, 1100 * 3.6 ** pitch, 1.9 + 1.9 * life])
    s, db, hz, cycles = np.vstack([DROPS, stray]).T
    out = np.zeros(N)
    add(out, s, hz, cycles, amp(db), .04, 2.5, SR)
    return placed(out)


def swarm(bubbles_per_s, low_hz, high_hz, cycles, scatter_db, wash):
    """Bubbles at random moments, a few much louder, over a wash of those too small to tell apart."""
    pair = np.zeros((2, N))
    for channel in pair:
        when, size, life, sign = rng.random((int(bubbles_per_s * N / SR), 4)).T
        hz = low_hz * (high_hz / low_hz) ** rng.random(len(when))
        rarity = -np.log(size + .01)
        gain = amp(scatter_db * rarity) * np.sign(sign - .5)
        add(channel, when * N / SR, hz, cycles * (.5 + life), gain, .1, 1.5, SR)
    # level the swarm's spectral slope
    white = filtered(unit(pair), lambda f: np.clip(f / low_hz, 1, high_hz / low_hz))
    return unit(white) + wash * patchy(2)


def slapped():
    """Gains of the three sizes: every slap swells fast over the stirring and sinks back."""
    power, t = amp(stirring()) ** 2, np.arange(N) / SR
    for s, db, large_db, spray_db in SLAPS:
        flank_db = np.minimum(RISE_DB_PER_S * (t - s), FALL_DB_PER_S * (s - t))
        peak_db = db + np.array([[large_db], [0], [spray_db]])
        power = power + amp(peak_db) ** 2 * amp(flank_db) ** 2
    return np.sqrt(power)


def churned_water():
    """Legs, dripping mesh and the lead line trap bubbles of three sizes, heard as three swarms."""
    large_gain, small_gain, spray_gain = slapped()
    ring, = curves(RING_SHARE)
    slosh = swarm(bubbles_per_s=1100, low_hz=318, high_hz=1645, cycles=1.95, scatter_db=1.5, wash=0.48)
    splash = swarm(bubbles_per_s=3500, low_hz=1433, high_hz=4950, cycles=2.4, scatter_db=2.5, wash=0.47)
    fine = swarm(bubbles_per_s=2500, low_hz=4880, high_hz=15100, cycles=0.87, scatter_db=4.0, wash=1.6)
    ring_spray = panned(spread(fine, SPRAY_SPECTRUM, NEAR_SIDE), np.array([RING_PAN_DB]))
    drips = spread(fine, DRIP_SPECTRUM, NEAR_SIDE)
    spray = ring * ring_spray + (1 - ring) * drips
    large = large_gain * spread(slosh, SLOSH_SPECTRUM, NEAR_SIDE)
    small = small_gain * spread(splash, SPLASH_SPECTRUM, NEAR_SIDE) * amp(0.72 * spurts(size=250))
    finest = spray_gain * spray * amp(1.4 * spurts(size=500))
    near = large + placed(small + finest)
    return stirred_share() * amp(1.0 * spurts(size=900)) * near


def gulp():
    """The air pocket shrinks, so its pitch climbs."""
    return glide(GULP)


def scene():
    """All sources in the open air."""
    return traffic() + ripples() + ticks() + birds() + drops() + churned_water() + gulp()


def record(dry):
    """Two ports a finger apart: below the treble the left one lags; nothing is kept above the band limit."""
    delay_samples = curves(LAG)[0] * SR / 10 ** 6
    late = map_coordinates(dry[0], [np.arange(N) - delay_samples], order=3, mode="nearest")
    left = dry[0] + filtered(late - dry[0], lambda hz: 1 / (1 + (hz / 7500) ** 4))
    return filtered(np.array([left, dry[1]]), lambda hz: hz < TOP_HZ)


dry = scene()
out = record(dry)
int16_out(out)
```